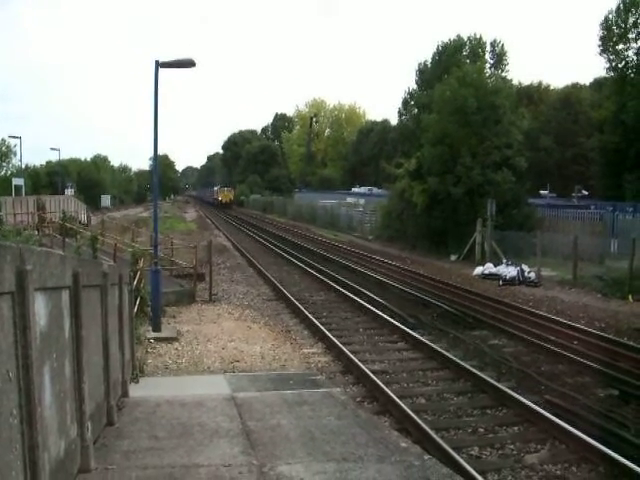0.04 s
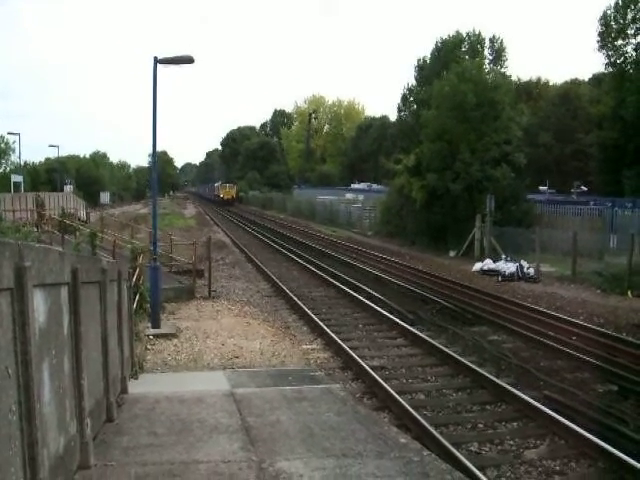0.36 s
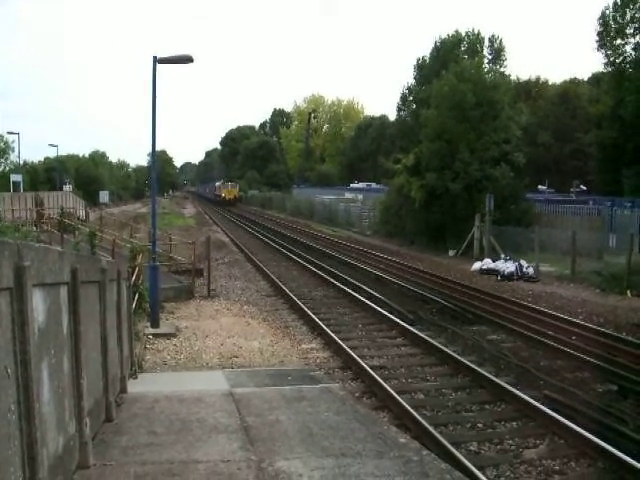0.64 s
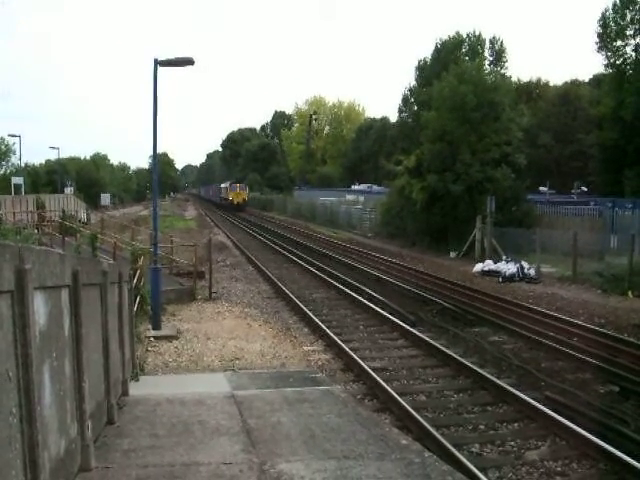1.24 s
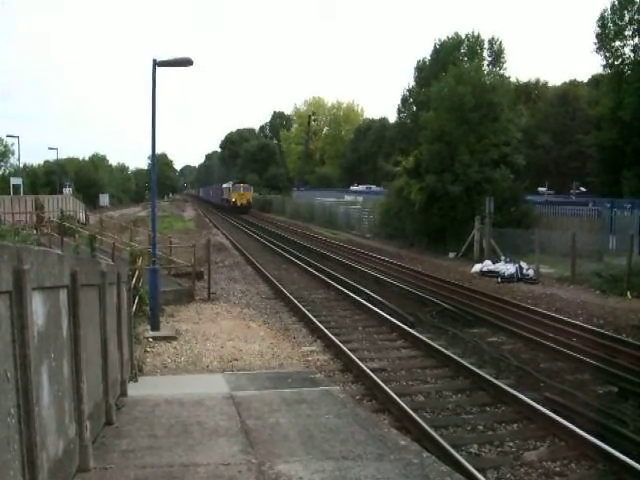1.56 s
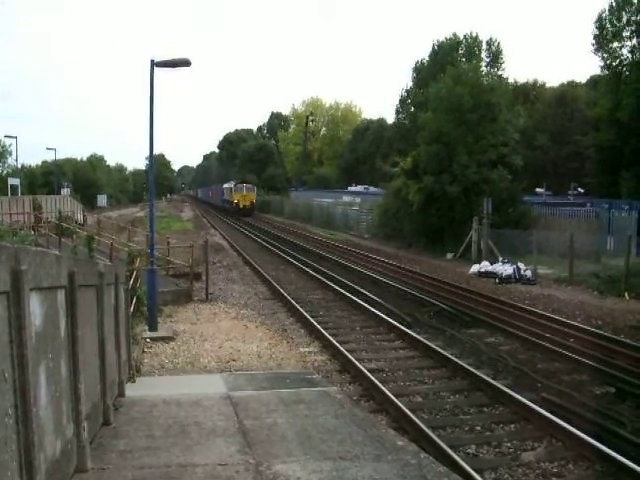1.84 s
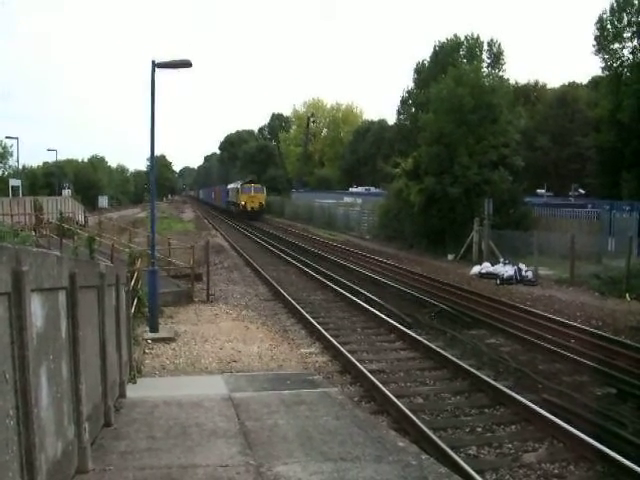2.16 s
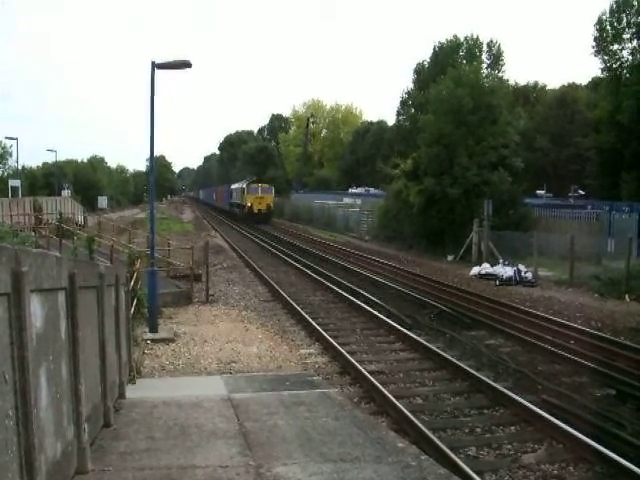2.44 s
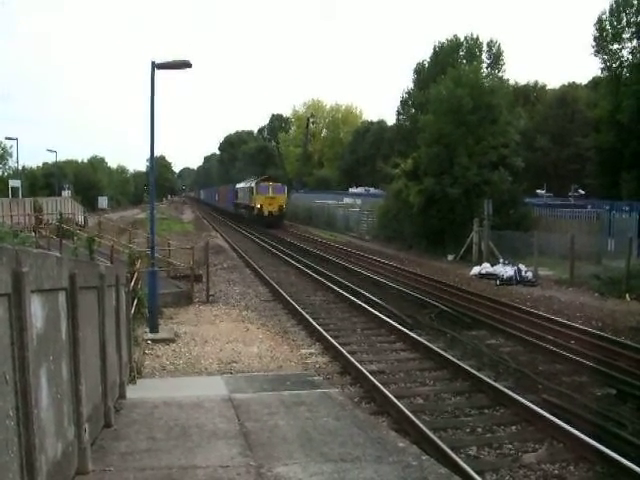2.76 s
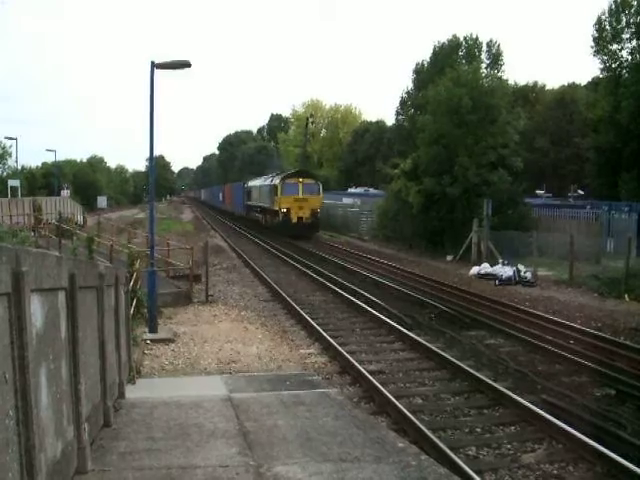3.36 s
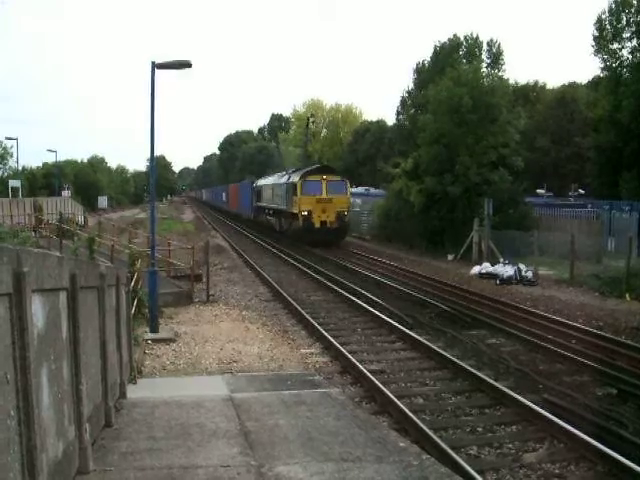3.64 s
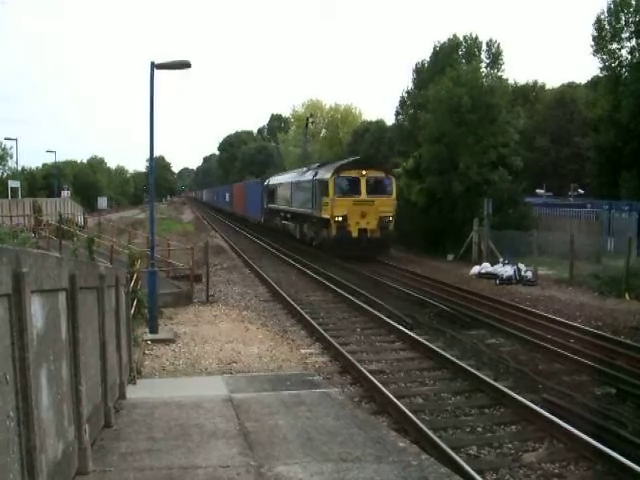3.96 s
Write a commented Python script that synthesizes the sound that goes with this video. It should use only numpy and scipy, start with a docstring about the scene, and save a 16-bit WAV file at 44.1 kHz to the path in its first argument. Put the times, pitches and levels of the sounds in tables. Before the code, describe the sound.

An oncoming freight train rumbles closer on singing rails, while two wind pops hit the microphone.

```python
"""At a small station, a diesel freight train is coming closer. Its engine throbs, its wheels roar
and the rails sing ever louder, with brief zings and swishes. Far wagons clatter behind it.
The air hisses softly, and there is one light double knock nearby. Puffs of wind pop on the
microphone; the strong ones overload it and make its gain control turn the sound down for a moment."""
import sys
import numpy as np
from scipy import signal
from scipy.fft import rfft, irfft, next_fast_len
from scipy.io import wavfile
from scipy.ndimage import uniform_filter1d, map_coordinates

SR = 44100
rng = np.random.default_rng(int(sys.argv[2]) if len(sys.argv) > 2 else 0)


def wav_out(sig):
    """Save sig, one row per channel (or a flat mono array), as 16-bit PCM at SR to the path in sys.argv[1]."""
    wavfile.write(sys.argv[1], SR, np.round(np.clip(np.atleast_2d(sig).T, -1, 1) * 32767).astype(np.int16))


N = 176400
TIME = np.arange(N) / SR


def amp(db):
    """Turn decibels into a number to multiply by."""
    return 10 ** (np.asarray(db) / 20)


def unit(x):
    """Scale a signal so that its average strength (rms) is 1."""
    return x / np.sqrt(np.mean(x ** 2) + 1e-20)


def follow(points):
    """Join (time, value) points with straight lines."""
    return np.interp(TIME, *np.transpose(points))


def wobble(rate):
    """A smooth curve through `rate` random values a second."""
    return map_coordinates(rng.standard_normal(int(N * rate / SR) + 4), [TIME * rate], mode="nearest")


def filtered(x, response):
    """Make each frequency of x louder or softer by response(hz)."""
    size = next_fast_len(N + SR // 2)
    return irfft(rfft(x, size) * response(np.fft.rfftfreq(size, 1 / SR)), size)[:N]


def rush(spectrum, patchy_db):
    """Noise of strength 1, shaped by (f, level) points, with random louder and softer patches."""
    grid = signal.stft(rng.standard_normal(N), nperseg=1024)[2]  # frequency by time
    patches = uniform_filter1d(rng.standard_normal(grid.shape), size=6, axis=0)
    patches = uniform_filter1d(patches, size=6, axis=1)
    noise = signal.istft(grid * amp(patchy_db * unit(patches)), nperseg=1024)[1][:N]
    f, db = np.transpose(spectrum)
    shape = lambda hz: amp(np.interp(np.log(hz + 1), np.log(f + 1), db, left=-120, right=-120))
    return unit(filtered(noise, shape))


def ringing(centre_hz, width_hz):
    """Noise of strength 1 that rings around one pitch."""
    peak = lambda hz: 1 / (1 + 2 * ((hz - centre_hz) / width_hz) ** 2)
    return unit(filtered(rng.standard_normal(N), peak))


def nearing(growth, start_m=136.2, speed_m_per_s=24.5):
    """Gain that rises as the train nears; with growth 1, half the distance doubles it."""
    return (start_m / (start_m - speed_m_per_s * TIME)) ** growth


# Tones of the engine's throb: cycles per crankshaft turn, relative level/dB
THROB_TONES = [(3, -41.5), (4, -43.5), (5, -43), (6, -45.5), (8, -46), (9, -44), (10, -53), (11, -51),
               (14, -59.5), (17, -59), (20, -55.5)]
# Tones of the locomotive's hum: f/Hz, relative level/dB
HUM_TONES = [(254.4, -47), (381.6, -57.5), (508.8, -64)]
# Shape of the exhaust noise: f/Hz, relative level/dB
EXHAUST_SPECTRUM = [(20, -19), (45, -4.5), (90, -1), (145, 0), (220, -1), (280, -6.5), (350, -12.5),
                    (430, -18), (600, -17), (800, -36)]
# How throb and exhaust grow as the engine nears: t/s, relative level/dB
ENGINE_LOUDNESS = [(0, -4.5), (.6, -1.5), (1.2, 1), (2.0, 1.5), (2.5, 3.5), (3.05, 8), (3.4, 9),
                   (3.65, 7.5), (3.95, 12.5)]

def engine(shaft_hz=16.1):
    """The turning crankshaft throbs under a rough hum, while the exhaust rumbles."""
    engine_time = np.cumsum(1 + .003 * wobble(3)) / SR  # the speed is slightly unsteady

    def tone(hz, db):
        """One engine tone, fading in and out on its way to us."""
        strength = np.sqrt(2) * amp(db + 2.45 * wobble(5))
        return strength * np.sin(2 * np.pi * (hz * engine_time + rng.random()))

    throb = amp(-2) * sum(tone(cycles * shaft_hz, db) for cycles, db in THROB_TONES)
    hum_gain = amp(-3.5 + 2.5 * wobble(25)) * nearing(growth=.9)
    hum = hum_gain * sum(tone(hz, db) for hz, db in HUM_TONES)
    exhaust = amp(-39 + .6 * wobble(9)) * rush(EXHAUST_SPECTRUM, patchy_db=1.9)
    return amp(follow(ENGINE_LOUDNESS)) * (throb + exhaust) + hum


# Shape of the noise of wheels on rails: f/Hz, relative level/dB
ROLLING_SPECTRUM = [(260, -39), (450, -21), (490, -10), (540, -10.5), (614, -10), (668, -11), (819, -4),
                    (902, -10), (982, -0.5), (1080, 0.5), (1130, 2), (1300, -5), (1400, -5.5), (1810, 2),
                    (2100, -12), (2310, -7), (2660, -12.5), (2960, -11), (3220, -14), (4080, -21.5),
                    (4390, -30), (4990, -29), (5800, -46), (7540, -71.5), (12800, -120)]
# Pitches at which the rails ring: f/Hz, width/Hz, relative level/dB
RAIL_PITCHES = [(1154, 32, -47.5), (1284, 30, -47.5), (1689, 45, -46), (1814, 32, -44.5), (1865, 22, -51.5),
                (1991, 7.3, -54.5), (2277, 44, -61), (2864, 30, -57.5), (2992, 18, -56), (3970, 18, -72.5)]

def wheels():
    """Rolling wheels roar and make the rails sing, louder as they come closer."""
    roar_gain = amp(-38 + .3 * wobble(8.9)) * nearing(growth=1.08)
    roar = roar_gain * rush(ROLLING_SPECTRUM, patchy_db=1.28)
    song = sum(amp(db + 1.9 * wobble(6)) * ringing(hz, width) for hz, width, db in RAIL_PITCHES)
    return roar + amp(-3) * nearing(growth=1.094) * song


# Shape of the far wagons' noise: f/Hz, relative level/dB
WAGON_SPECTRUM = [(220, -22.5), (330, -13), (450, -18.5), (560, -13.5), (660, -13), (800, -5), (930, 0.5),
                  (1100, -4.5), (1270, -7.5), (1420, -14), (1800, -14.5), (2100, -19), (3000, -21),
                  (3800, -50.5)]
# How that noise rises and falls: t/s, level/dB
WAGON_LOUDNESS = [(0, -33.5), (.3, -32), (.65, -32.5), (.82, -35), (1.1, -32), (1.65, -34.5), (2.05, -37.5),
                  (2.7, -32), (3.3, -35.5), (3.7, -31), (4, -34.5)]

def wagons():
    """The clatter of far wagons blurs into a fluttering noise."""
    flutter_db = 1.04 * wobble(35)
    return amp(follow(WAGON_LOUDNESS) + flutter_db) * rush(WAGON_SPECTRUM, patchy_db=2.5)


# Shape of the outdoor hiss: f/Hz, relative level/dB
HISS_SPECTRUM = [(1500, -7.5), (2600, 0.5), (3400, 2), (3800, -10), (4400, -7.5), (5100, -7.5), (5600, -15),
                 (6000, -25)]
# Shape of the wind noise on the microphone: f/Hz, relative level/dB
BREEZE_SPECTRUM = [(6, -22), (12, 4), (35, 1), (60, -8), (100, -9), (200, -19.5), (400, -31)]

def air():
    """The outdoors hisses steadily, and a light breeze rumbles on the microphone."""
    hiss = amp(-49) * rush(HISS_SPECTRUM, patchy_db=1.6)
    breeze = amp(-36 + 1.3 * wobble(8)) * rush(BREEZE_SPECTRUM, patchy_db=-1.0)
    return hiss + breeze


# When the wagons clank: t/s, level/dB
CLANK_TIMES = [(0.103, -20.5), (0.177, -27), (0.209, -25), (1.147, -24), (1.322, -22.5), (1.898, -24.5),
               (1.955, -24), (2.25, -23), (2.649, -26.5), (2.745, -23.5)]
# Tones in one clank: f/Hz, relative level/dB
CLANK_TONES = [(900, -8.5), (1000, 0), (1130, -9)]

def clanks(rise_s=.0039, pitch_spread=.025):
    """The wagons clank and ring briefly, at slightly different pitches each time."""
    out = np.zeros(N)
    for start, level in CLANK_TIMES:
        age = np.maximum(TIME - start, 0)
        ring = sum(amp(db) * np.sin(2 * np.pi * (hz * rng.normal(1, pitch_spread) * age + rng.random()))
                   for hz, db in CLANK_TONES)
        rise_and_fall = age / rise_s * np.exp(1 - age / rise_s)
        out += amp(level) * ring * rise_and_fall
    return out


def swell(peak_s, half_width_s):
    """A bell-shaped rise and fall around one moment."""
    return np.exp(-.5 * ((TIME - peak_s) / half_width_s) ** 2)


# When the rails zing: t/s, level/dB
ZING_TIMES = [(0.219, -48.5), (.3, -45), (.42, -44), (.54, -52), (.66, -48), (1.64, -47.5), (2.68, -40.5)]

def rail_zings():
    """Thin, faint zings run along the rails ahead of the train."""
    loudness = sum(amp(db) * swell(peak_s, half_width_s=.011) for peak_s, db in ZING_TIMES)
    return loudness * ringing(centre_hz=3426, width_hz=110)


# The two hits of the double knock: t/s, relative level/dB
KNOCK_TIMES = [(1.561, -4.5), (1.5641, -16)]
# Tones in one hit: f/Hz, relative level/dB, time to fade by 60 dB/s
KNOCK_TONES = [(377, -1.5, 0.015), (610, -7.5, 0.016), (980, 1.5, 0.0097)]

def knocks(rise_s=.001):
    """A dull, soft double knock near the microphone dies away at once."""
    out = np.zeros(N)
    for start, level in KNOCK_TIMES:
        age = np.maximum(TIME - start, 0)
        ring = sum(amp(level + db - 60 * age / fade_s) * np.sin(2 * np.pi * hz * age)
                   for hz, db, fade_s in KNOCK_TONES)
        out += ring * (1 - np.exp(-(age / rise_s) ** 2))
    return out


# When the rails swish: t/s, half width/s, level/dB
SWISH_TIMES = [(1.676, 0.099, -37), (3.9, 0.082, -32)]
# Shape of the swishing noise: f/Hz, relative level/dB
SWISH_SPECTRUM = [(1200, -5.5), (1700, 2), (2400, -0.5), (3100, 0.5), (3500, -3.5), (4100, -11),
                  (5200, -15), (5900, -37.5)]

def rail_swishes():
    """Short swells of hiss run along the rails ahead of the train."""
    loudness = sum(amp(db) * swell(peak_s, half_width_s) for peak_s, half_width_s, db in SWISH_TIMES)
    return loudness * rush(SWISH_SPECTRUM, patchy_db=3.0)


# When each puff of wind turns from pulling to pushing: t/s, level/dB, time scale/s
WIND_PUFFS = [(1.7378, 14.5, 0.00073), (3.1437, 7.5, 0.00094), (3.4148, -13, 0.00069),
              (3.4758, -16, 0.00053)]

def wind_pops(rebound=1.09, tail=2.12):
    """Each puff sucks at the microphone's thin diaphragm, which snaps back and settles more slowly."""
    out = np.zeros(N)
    for turn_s, db, scale_s in WIND_PUFFS:
        progress = (TIME - turn_s) / scale_s
        before, after = np.minimum(progress, 0), np.maximum(progress, 0)
        pull = before * np.exp(-before ** 2 / 2)
        swing_back = rebound * after * np.exp(-after / tail - (after / tail) ** 2 / 2)
        out += amp(db) * (pull + swing_back)
    return out


def scene():
    """Add the train, the air and the nearby sounds into one channel."""
    background = engine() + wheels() + wagons() + air()
    events = clanks() + rail_zings() + knocks() + rail_swishes() + wind_pops()
    return (background + events)[None]


def gain_control(x, limit_db=-8.5, attack_s=.0029, release_s=.036):
    """Peaks above the limit quickly turn the sound down; it comes back more slowly."""
    excess_db = np.maximum(20 * np.log10(np.abs(x) + 1e-9) - limit_db, 1e-9)
    fall = TIME / release_s
    held_db = np.exp(np.maximum.accumulate(np.log(excess_db) + fall) - fall)  # each peak lingers, fading
    smoothing = np.exp(-1 / (attack_s * SR))
    cut_db = signal.lfilter([1 - smoothing], [1, -smoothing], held_db)
    return x * amp(-cut_db)


def record(dry, ceiling=.71, top_hz=5900):
    """After the gain control, peaks still too big are clipped flat and the high treble is cut off."""
    clipped = np.clip(gain_control(dry[0]), -ceiling, ceiling)
    return filtered(clipped, lambda hz: 1 / np.sqrt(1 + (hz / top_hz) ** 120))[None]


dry = scene()
out = record(dry)
wav_out(out)
```